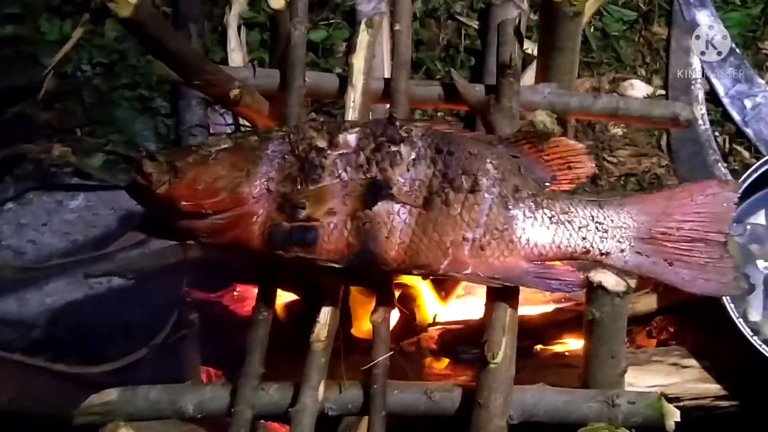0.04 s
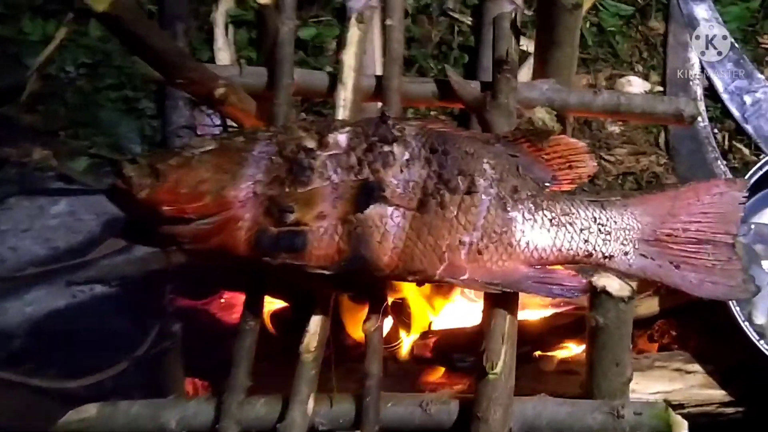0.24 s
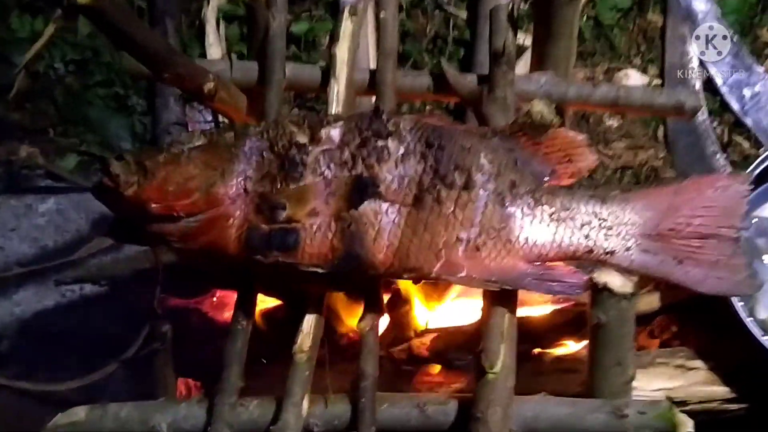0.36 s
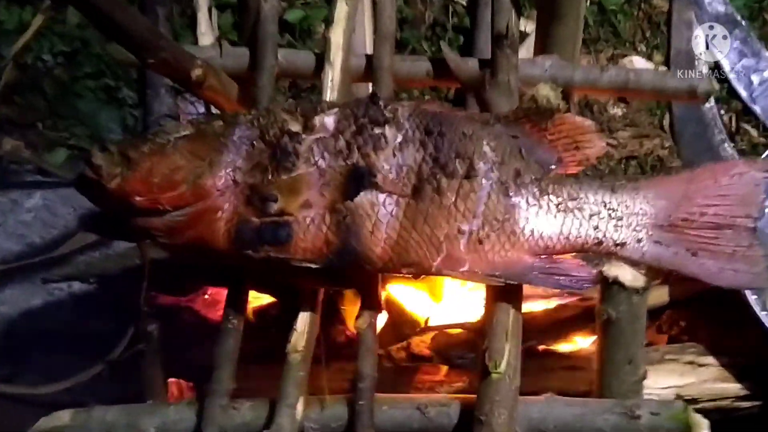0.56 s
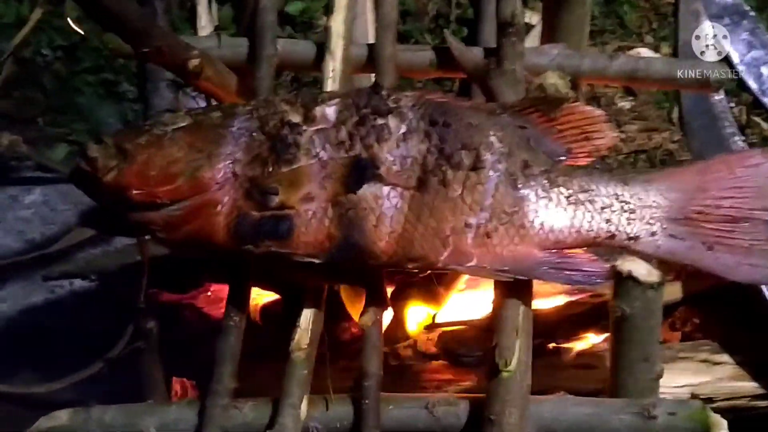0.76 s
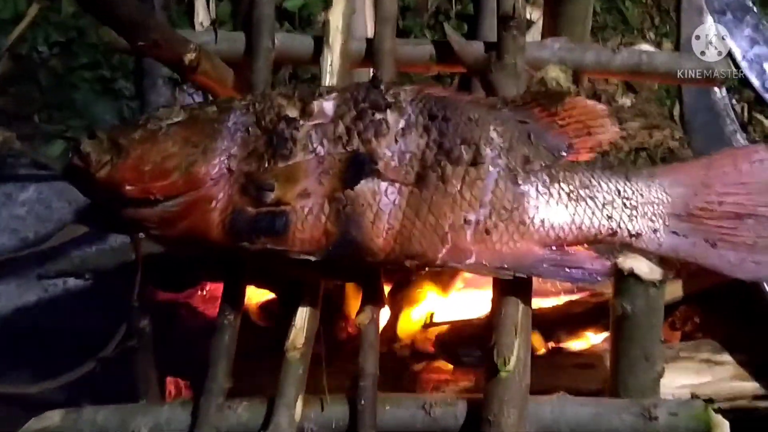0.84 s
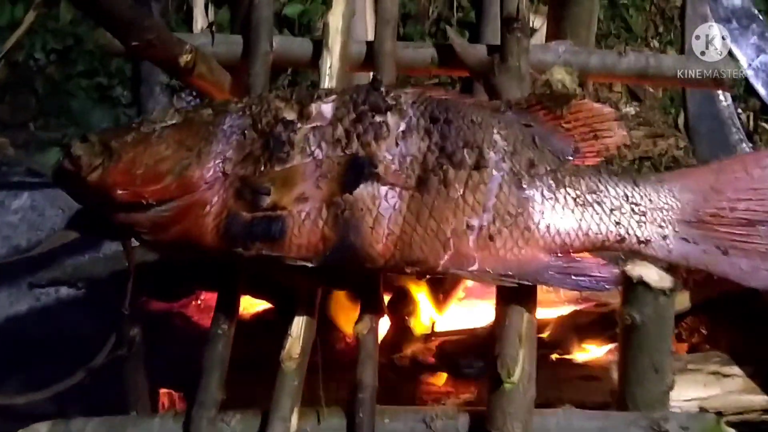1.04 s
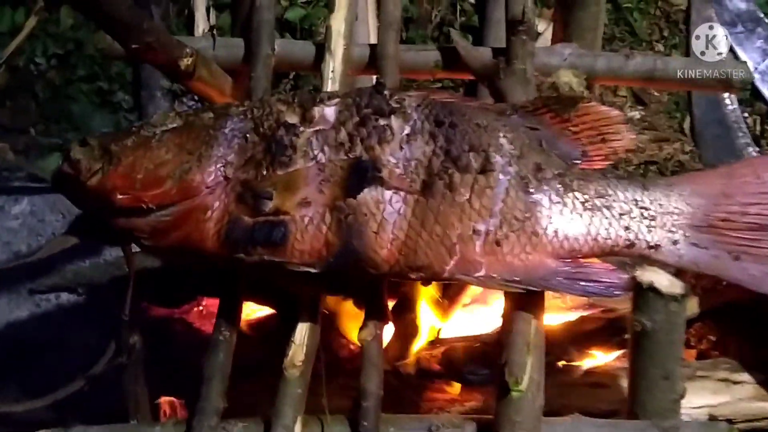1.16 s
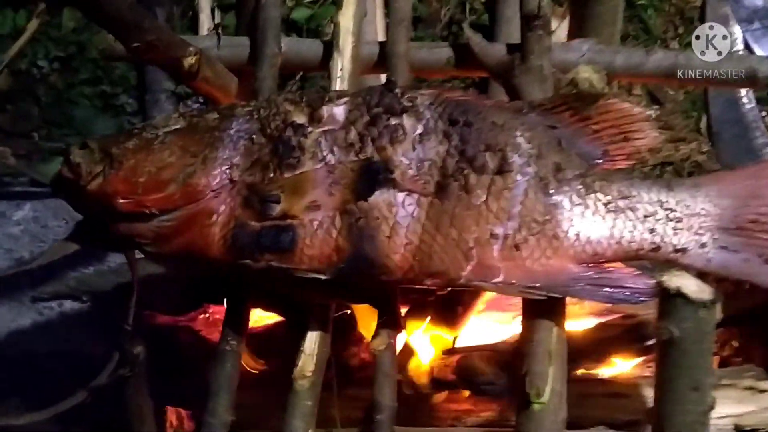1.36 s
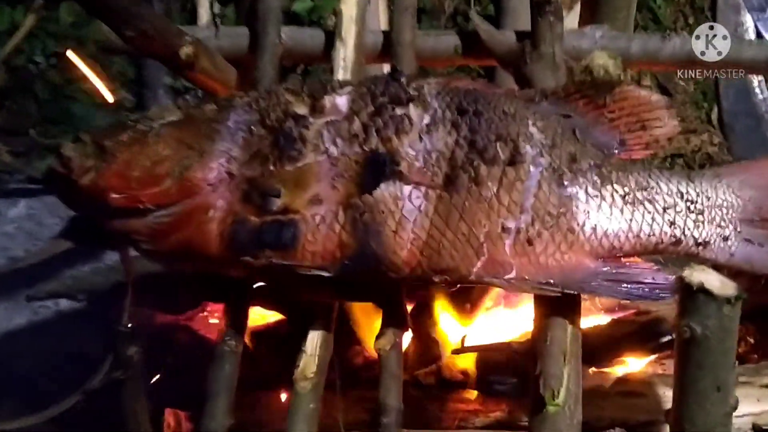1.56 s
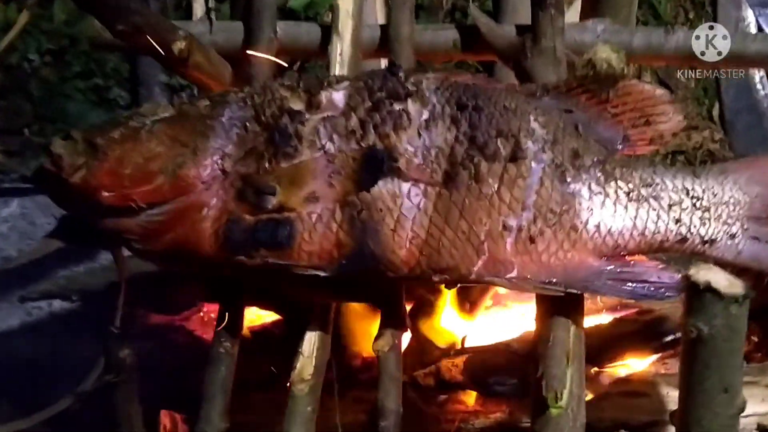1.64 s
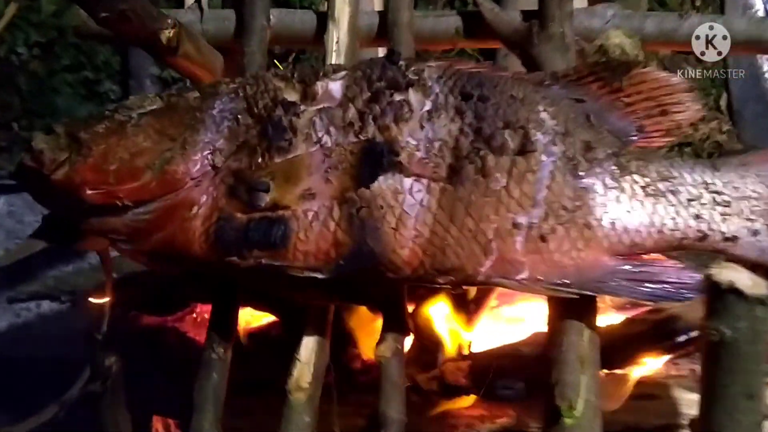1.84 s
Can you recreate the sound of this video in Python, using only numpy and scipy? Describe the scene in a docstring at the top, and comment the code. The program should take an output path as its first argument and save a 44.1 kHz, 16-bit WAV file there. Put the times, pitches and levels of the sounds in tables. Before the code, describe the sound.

Close by, a campfire snaps and pops unevenly over softly rumbling flames: one loud crack, lighter ticks, then a loud cluster followed by slight sputtering steam. Far off in the night forest, insects are barely audible.

```python
"""A small wood fire, close to the microphone, under a grill of sticks at a forest camp at night.
Pockets in the wood burst: a pressure thump, a puff of gas, a short woody ring and a bright snap,
scattered back by leaves and brush. The flames rumble softly; two faint rustles pass, and steam
escapes after the later big pops.
Far off in the forest, insects trill, chirp and hold thin notes over a faint hiss."""
import sys
import numpy as np
from scipy import signal
from scipy.fft import rfft, irfft
from scipy.io import wavfile
from scipy.ndimage import uniform_filter1d

SR = 44100
rng = np.random.default_rng(int(sys.argv[2]) if len(sys.argv) > 2 else 0)


def waveform_to_disk(signal):
    """Save audio, clipped to [-1, 1], as 16-bit WAV at the path in sys.argv[1]."""
    frames = np.transpose(np.atleast_2d(signal))
    scaled = np.clip(frames, -1, 1) * 32767
    samples = np.round(scaled).astype(np.int16)
    wavfile.write(sys.argv[1], SR, samples)


N = 83790

# Rumble of the flames: frequency_hz, relative_db
FLAME_SPECTRUM = [(20, -43), (45, -30), (62, -26.5), (85, -4.5), (120, 3), (170, -0.5), (250, -9),
                  (400, -18), (700, -25.5), (1500, -28.5), (2800, -26.5), (3400, -36.5), (16000, -32)]
# Slow swell of the flames: time_s, gain_db
FLAME_SWELL = [(0, -3), (.3, -2), (.7, -1), (1.1, -1), (1.4, -1), (1.6, -2.5), (1.9, -0.5)]
# Background hiss: frequency_hz, relative_db
AIR_SPECTRUM = [(100, 3), (3500, 4), (7800, 4.5), (9000, 10), (12000, -14.5), (13500, -3), (15500, 6.5),
                (16500, 12)]
# Distant trilling insects: pitch_hz, width_hz, level_db, pulse_rate_hz
INSECT_TRILLS = [(5440, 110, -80.5, 140), (5990, 280, -72, 99), (9800, 390, -84.5, 94),
                 (10350, 430, -76.5, 80)]
# Distant held insect notes: start_s, length_s, pitch_hz, level_db
INSECT_NOTES = [(-.05, .17, 4390, -79.5), (.1, .55, 4490, -83), (0.597, 1.35, 4560, -77.5)]
# Bursting pockets in the wood; sizzle is a treble shelf applied on top of snap and scatter:
# start_s, thump_db, thump_hz, puff_db, ring_db, ring_hz, snap_db, scatter_db,
# scatter_tilt_db_per_octave, sizzle_db
WOOD_POPS = [(0.2472, -37.0, 1010.0, -59, -35, 1980, -38, -43.0, 1.5, -1),
             (0.2763, -60, 1090.0, -76, -48, 2100, -51.0, -53, 1, 20),
             (0.3103, -24.5, 1070, -40.5, -28, 2116, -31.5, -30, 1.6, -15),
             (0.3547, -62, 950.0, -69.0, -42.0, 2620, -44, -51, 3, 3),
             (0.508, -61, 950, -79, -50.0, 2360, -51.5, -51.5, 1.5, 6),
             (0.5445, -60.5, 980.0, -65, -51.0, 2400, -62, -65, 0, 12),
             (0.584, -49, 815, -50.5, -54.5, 2300, -73, -63.5, -5, 2),
             (0.6134, -52, 965, -57, -47.5, 2350, -60, -51.5, -6.5, 12.0),
             (0.62, -45.5, 960, -63.0, -48.0, 2400, -49.0, -50.5, -2.5, 2.5),
             (0.8694, -86, 930, -98.0, -84, 2500, -65, -70, 0.9, 6),
             (0.9096, -49.5, 830, -54, -53, 2130, -56.0, -54.5, -0.5, 2),
             (0.9449, -45.0, 884, -53.5, -39.5, 2236, -43.5, -45, 2.5, 5),
             (1.0197, -44.5, 930, -51, -42.5, 2124, -57.5, -58, -2.0, 25),
             (1.206, -58.5, 590.0, -80, -55.5, 2340, -65, -67, 1, -5.0),
             (1.256, -48, 750, -70, -45.5, 2180, -49, -50, 0.5, 15),
             (1.3064, -30.5, 685, -35.5, -44, 2320, -60, -45.5, -5.5, 10),
             (1.3183, -34.0, 920, -49.0, -30.5, 1950.0, -37, -42.5, 0.2, 0),
             (1.3668, -64, 1020.0, -70, -53.0, 2110, -54, -55.5, 2, 16),
             (1.378, -46, 752, -49.5, -60, 2480, -69.0, -50, -11, 13.0),
             (1.383, -25.0, 770, -31.5, -30.5, 2400, -31.5, -32.5, 1.8, -9.5),
             (1.487, -56.5, 920, -76, -54, 2290, -71, -60.5, 2.5, 15),
             (1.5671, -48.5, 980.0, -59, -42.5, 2060, -60, -55, -4.9, 24),
             (1.705, -57.5, 1090, -64, -60, 2090, -69, -57.5, -5.5, 9),
             (1.7459, -60.0, 785, -77, -56.0, 2360, -56, -54, -1.5, 23),
             (1.858, -54, 740, -71, -51.5, 2570, -54, -51.5, 0.5, 19),
             (1.877, -50, 1060, -58.5, -46.5, 2290, -66, -51.5, -0.6, 1)]
# Echoes of the thump off sticks and stones close by: delay_s, gain
NEAR_ECHOES = [(.0009, 0.22), (.0019, .16), (.0027, -.15)]
# Modes of the burning wood: pitch_ratio, relative_db, t60_s
WOOD_MODES = [(.12, -13, 0.022), (.24, -11, 0.012), (.5, -10.5, 0.023), (.86, -3, 0.021), (0.998, 5, 0.012),
              (1.168, -1.5, 0.0092), (1.38, -5.5, 0.019), (1.62, -14.5, 0.014)]
# Tearing fibres: frequency_hz, relative_db
SNAP_SPECTRUM = [(1000, -13), (3000, 5), (4000, -2.5), (5000, -2.5), (6200, 1.5), (7600, 4.5), (9500, -3),
                 (12500, -9), (15200, -4.5), (16500, -2)]
# Echoes from the brush around the camp: frequency_hz, relative_db
SCATTER_SPECTRUM = [(80, -45), (200, 2), (700, 0.5), (1150, -0.5), (1550, -1), (2300, 1.5), (3400, -3.5),
                    (4900, -10.5), (6400, -9), (8300, 0.5), (10500, -6), (13000, -10.5), (15200, 1.5),
                    (16500, -16)]
# Rustles and steam hiss: frequency_hz, relative_db
RUSTLE_STEAM_SPECTRUM = [(100, -70), (400, -2), (700, 1.5), (900, -1), (1100, -2.5), (1650, 0), (2000, 3.5),
                         (2200, 3), (2430, 3.5), (2900, -7), (4000, -17), (6500, -35), (8500, -11.5),
                         (12000, -26), (16000, -12.5)]
# Two brief rustles, then the lasting steam: time_s, level_db
RUSTLE_STEAM_LEVEL = [(.36, -83), (.41, -64), (.47, -71), (.54, -92), (.68, -89), (.703, -59), (.74, -106),
                      (1.33, -64.5), (1.4, -59), (1.5, -60), (1.6, -60.5), (1.72, -58), (1.82, -60.5),
                      (1.9, -79)]
# One distant chirping insect: start_s, level_db
INSECT_CHIRPS = [(0.666, -74), (0.825, -78), (0.869, -74), (.913, -72), (1.113, -75), (1.154, -72.5),
                 (1.199, -76), (1.44, -71), (1.485, -71)]


def amp(db):
    return 10 ** (np.asarray(db) / 20)


def unit(x):
    """Scales to an rms of one."""
    return x / np.sqrt(np.mean(x ** 2) + 1e-20)


def burst(x, length_s=.005):
    """Scales a short sound to the energy of length_s at an rms of one."""
    return x / np.sqrt(np.sum(x ** 2) / (length_s * SR) + 1e-20)


def add(mix, start_s, sound):
    """Mixes a sound in at a time."""
    part = mix[max(round(start_s * SR), 0):][:len(sound)]
    part += sound[:len(part)]


def noise(spectrum, size, tilt=0):
    """Noise with a given spectrum, tilted in dB per octave above about 1 kHz."""
    octave = np.log2(np.fft.rfftfreq(size, 1 / SR) + 1)
    hz, db = np.transpose(spectrum)
    shape_db = np.interp(octave, np.log2(hz), db) + tilt * np.maximum(octave - 10, 0)
    return unit(irfft(rfft(rng.standard_normal(size)) * amp(shape_db), size))


def drift(rate_hz):
    """Smooth random wander with an rms of one."""
    hz = np.fft.rfftfreq(N, 1 / SR)
    return unit(irfft(rfft(rng.standard_normal(N)) * np.exp(-(hz / rate_hz) ** 2), N))


def level(points):
    """Gain along a curve of time_s, level_db."""
    return amp(np.interp(np.arange(N) / SR, *np.transpose(points)))


def flames():
    """The flames, close by: a soft low rumble that swells a little."""
    return amp(-57.5) * noise(FLAME_SPECTRUM, N) * level(FLAME_SWELL)


def night_air():
    """A faint steady hiss behind the camp."""
    return amp(-76) * noise(AIR_SPECTRUM, N)


def insect_trills(pulse_depth=.16):
    """A far chorus: each trill is a narrow band of noise, pulsing slightly unevenly."""
    t, hz = np.arange(N) / SR, np.fft.rfftfreq(N, 1 / SR)
    out = np.zeros(N)
    for pitch_hz, width_hz, db, rate_hz in INSECT_TRILLS:
        band = np.exp(-.5 * ((hz - pitch_hz) / width_hz) ** 2)
        buzz = irfft(rfft(rng.standard_normal(N)) * band, N)
        pulses = 1 + pulse_depth * np.sin(2 * np.pi * rate_hz * t + drift(rate_hz=8.9))
        out += amp(db) * unit(buzz * pulses)
    return out


def insect_notes(waver_hz=89.4, fade_s=.03):
    """Far insects hold thin notes that waver in pitch and level."""
    t, out = np.arange(N) / SR, np.zeros(N)
    for start_s, length_s, pitch_hz, db in INSECT_NOTES:
        gate = np.clip(np.minimum(t - start_s, start_s + length_s - t) / fade_s, 0, 1)
        tone = np.sin(2 * np.pi * np.cumsum(pitch_hz + waver_hz * drift(rate_hz=180)) / SR)
        flicker = 1 + .26 * drift(rate_hz=92)
        out += amp(db) * gate * unit(tone * flicker)
    return out


def thump(t, hz, trough_s=.00048):
    """One push-pull-push of pressure and its echoes off nearby sticks and stones."""
    def pulse(delay_s):
        u = (np.pi * hz * (t - trough_s - delay_s)) ** 2
        return (2 * u - 1) * np.exp(-u)
    return burst(pulse(0) + sum(gain * pulse(delay_s) for delay_s, gain in NEAR_ECHOES))


def puff(t, pitch_hz=180.5, rise_s=.006, t60_s=.021):
    """The freed gas gives the fire bed a short low push."""
    envelope = (1 - np.exp(-t / rise_s)) * amp(-60 * t / t60_s)
    return burst(np.gradient(np.sin(2 * np.pi * pitch_hz * t) * envelope))


def ring(t, pitch_hz, detune=.046, delay_s=.00035, rise_s=.00028):
    """The split wood rings in heavily damped modes, tuned a little differently at each pop."""
    age, out = np.maximum(t - delay_s, 0), 0
    for ratio, db, t60_s in WOOD_MODES:
        hz = pitch_hz * ratio * (1 + detune * rng.standard_normal())
        envelope = (1 - np.exp(-age / rise_s)) * amp(db - 60 * age / t60_s)
        swing = envelope * np.sin(2 * np.pi * (hz * age + rng.random()))
        out = out + np.gradient(swing) / hz
    return burst(out)


def snap(t, rise_s=.00086, t60_s=.011):
    """Fibres tear in a bright burst of a few milliseconds."""
    envelope = (1 - np.exp(-(t / rise_s) ** 2)) * amp(-60 * t / t60_s)
    return burst(noise(SNAP_SPECTRUM, len(t)) * envelope)


def sizzle(x, db, corner_hz=11700, width_hz=1800):
    """The share of the finest cracks: a shelf that lifts or lowers the highest treble."""
    hz = np.fft.rfftfreq(len(x), 1 / SR)
    shelf = .5 + .5 * np.tanh((hz - corner_hz) / (2 * width_hz))
    return irfft(rfft(x) * amp(db * shelf), len(x))


def scatter(t, db, tilt, rise_s=.0035, grain_db=2):
    """Countless small echoes reach the microphone from leaves, sticks and ground."""
    # A louder pop is heard from farther brush, so its tail lasts longer.
    reference_db, doubling_db = -38, 54.5
    t60_s = .097 * 2 ** ((db - reference_db) / doubling_db)
    roughness = unit(uniform_filter1d(rng.standard_normal(len(t)), size=30))
    grain = unit(amp(grain_db * roughness))
    envelope = (1 - np.exp(-(t / rise_s) ** 2)) * amp(-60 * (t / t60_s) ** 1.25)
    early_rms = np.sqrt(np.mean(envelope[:len(t) // 10] ** 2))
    return amp(db) * noise(SCATTER_SPECTRUM, len(t), tilt) * grain * envelope / early_rms


def pops(lead_s=.001, length_s=.149, echo_sizzle_cap_db=6.5):
    """Pockets burst close to the microphone, each its own mix of woody knock and bright crack."""
    out, t = np.zeros(N), np.arange(-lead_s, length_s, 1 / SR)
    age = np.maximum(t, 0)
    for (start_s, thump_db, thump_hz, puff_db, ring_db, ring_hz,
         snap_db, scatter_db, tilt, sizzle_db) in WOOD_POPS:
        push = amp(thump_db) * thump(t, thump_hz) + amp(puff_db) * puff(age)
        knock = amp(ring_db) * ring(age, ring_hz)
        crack = sizzle(amp(snap_db) * snap(age), sizzle_db)
        echoes = sizzle(scatter(age, scatter_db, tilt), min(sizzle_db, echo_sizzle_cap_db))
        add(out, start_s - lead_s, push + knock + crack + echoes)
    return out


def rustles_and_steam(sputter_db=2):
    """Two brief faint rustles, then a lasting, sputtering hiss of steam."""
    hiss = noise(RUSTLE_STEAM_SPECTRUM, N)
    sputter = amp(sputter_db * drift(rate_hz=30))
    return unit(hiss * sputter) * level(RUSTLE_STEAM_LEVEL)


def insect_chirps(length_s=.0252, top_hz=5600, fall_hz=840, roughness=.45):
    """One far insect gives short, rough chirps that slide downwards."""
    progress = np.arange(0, length_s, 1 / SR) / length_s
    tone = np.sin(2 * np.pi * np.cumsum(top_hz - fall_hz * progress) / SR)
    chirp = unit(np.sin(np.pi * progress) ** 2 * tone)
    out = np.zeros(N)
    for start_s, db in INSECT_CHIRPS:
        add(out, start_s, amp(db) * chirp)
    return out * (1 + roughness * drift(rate_hz=300))


def scene():
    """One microphone at the camp: fire in front, the night forest behind."""
    near = pops() + flames() + rustles_and_steam()
    forest = insect_trills() + insect_chirps() + insect_notes() + night_air()
    return (near + forest)[None]


def record(dry, low_cut_hz=18.3, band_limit_hz=15850):
    """The microphone's bass roll-off and the recorder's band limit."""
    microphone = signal.lfilter(*signal.butter(1, low_cut_hz, "highpass", fs=SR), dry)
    lowpass = signal.firwin(511, band_limit_hz, window=("kaiser", 9), fs=SR)
    return signal.oaconvolve(microphone, lowpass[None], "same")


dry = scene()
out = record(dry)
waveform_to_disk(out)
```